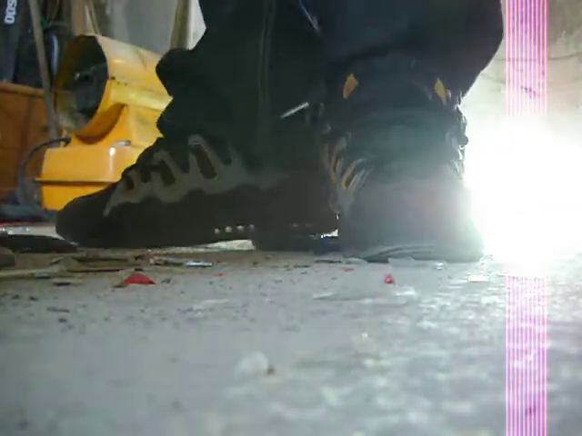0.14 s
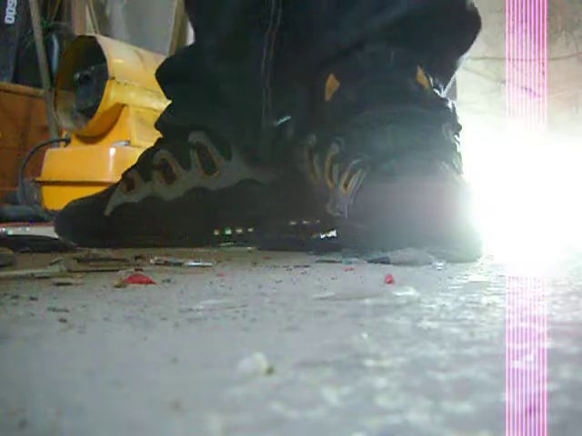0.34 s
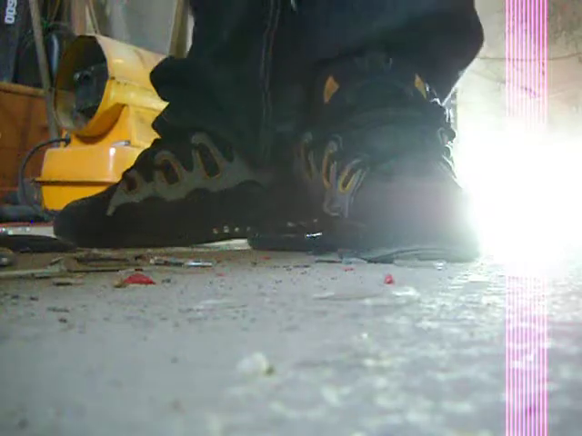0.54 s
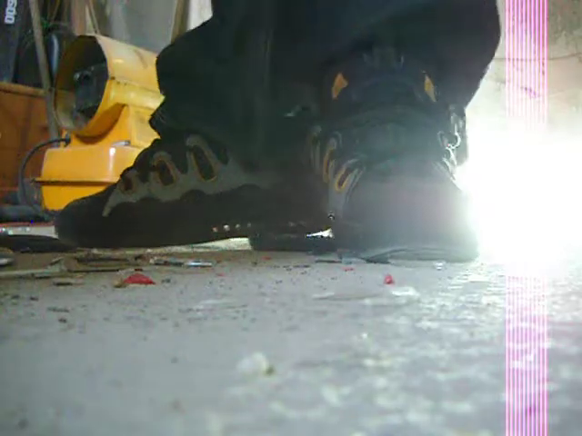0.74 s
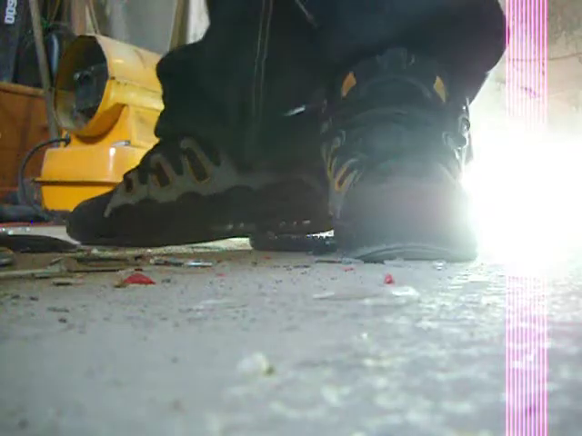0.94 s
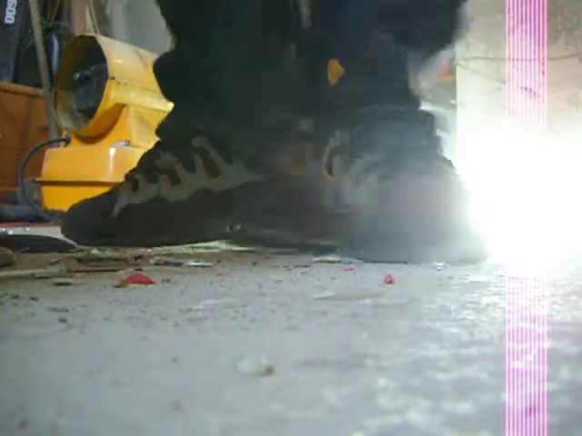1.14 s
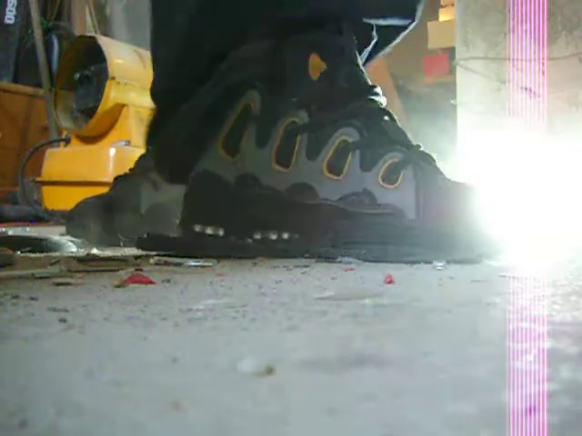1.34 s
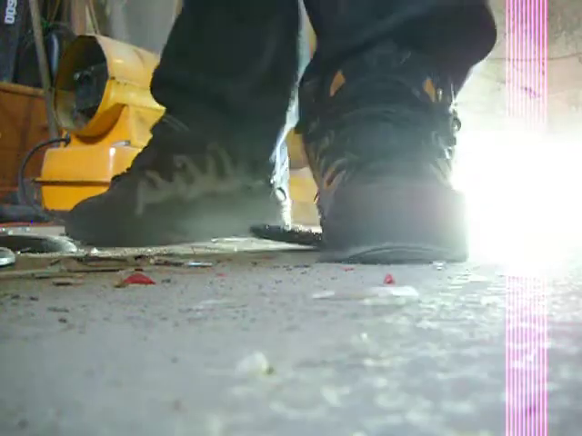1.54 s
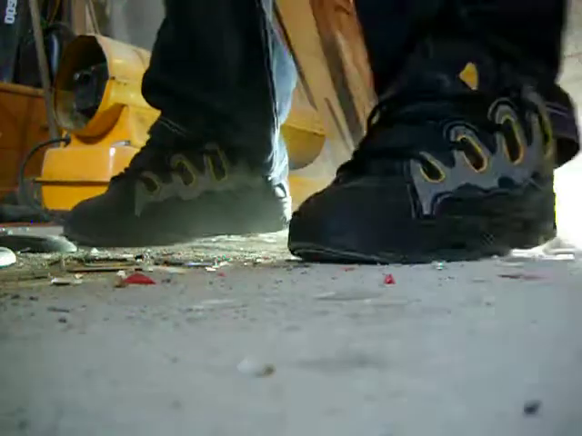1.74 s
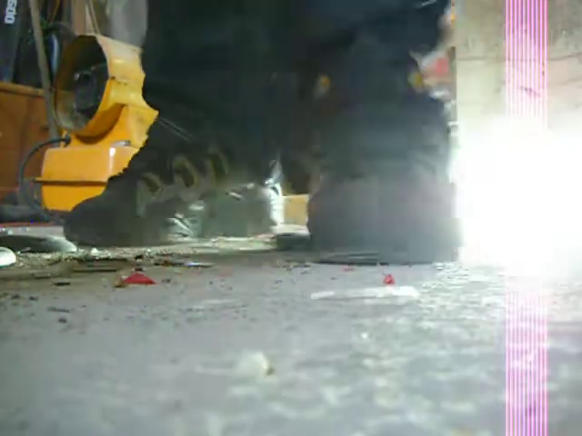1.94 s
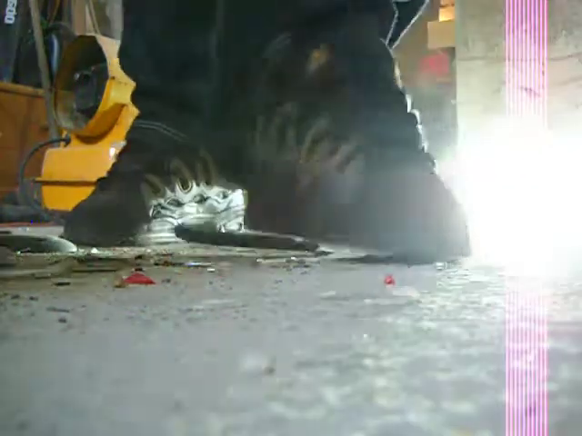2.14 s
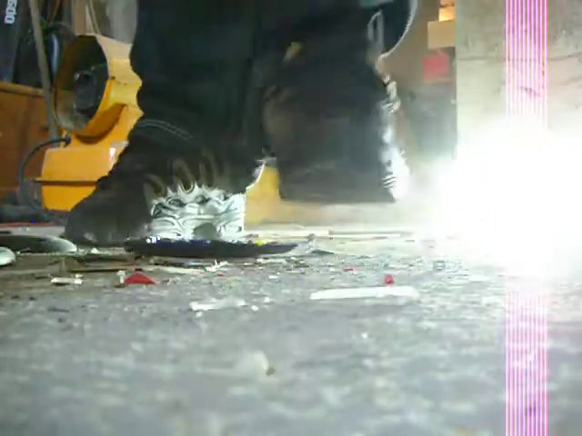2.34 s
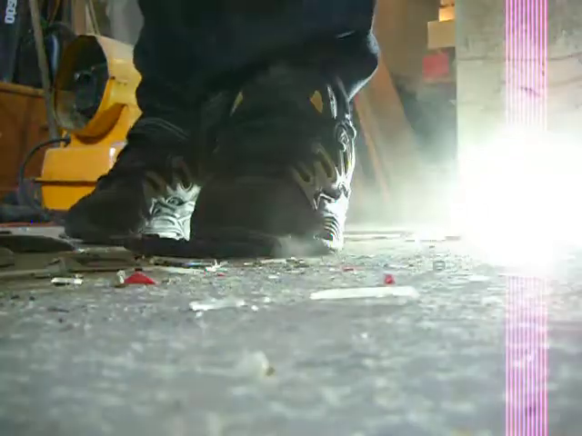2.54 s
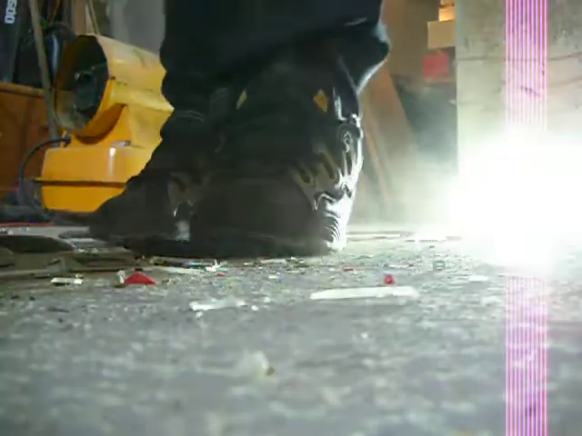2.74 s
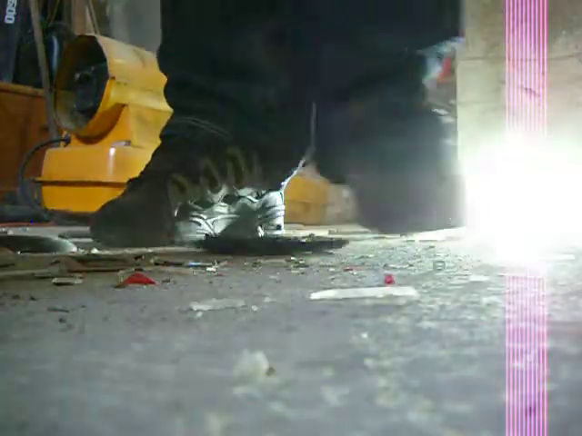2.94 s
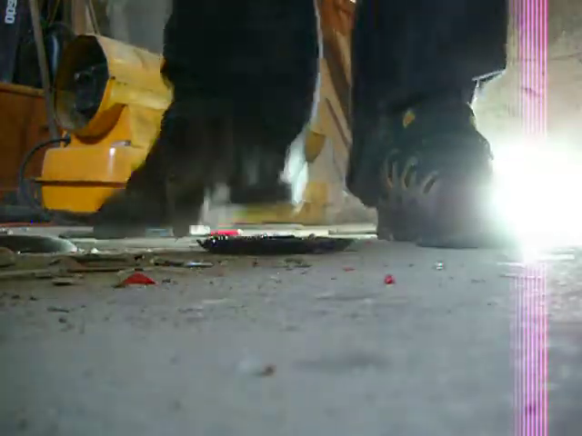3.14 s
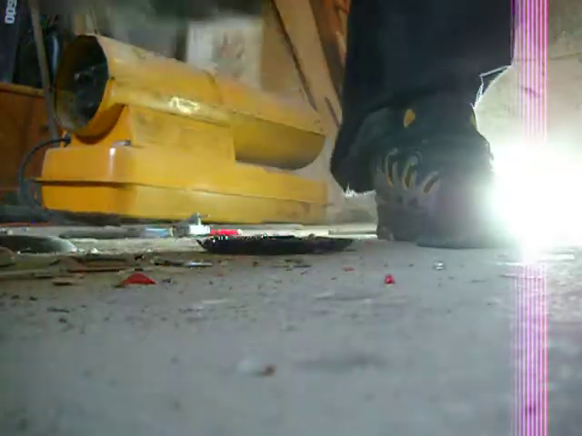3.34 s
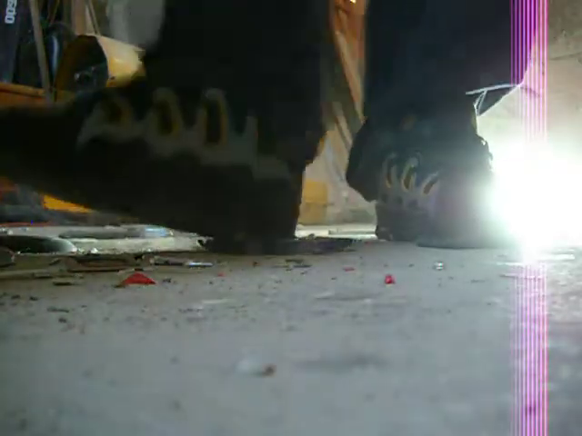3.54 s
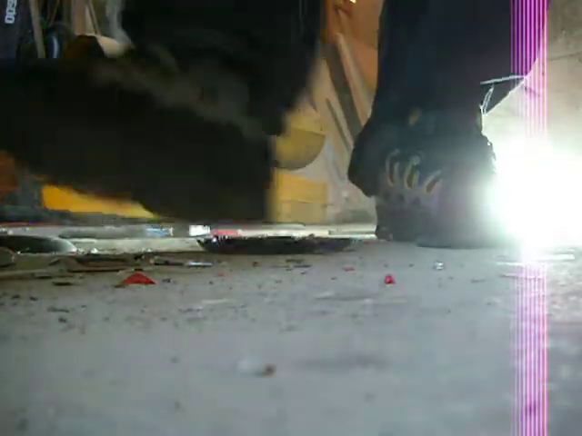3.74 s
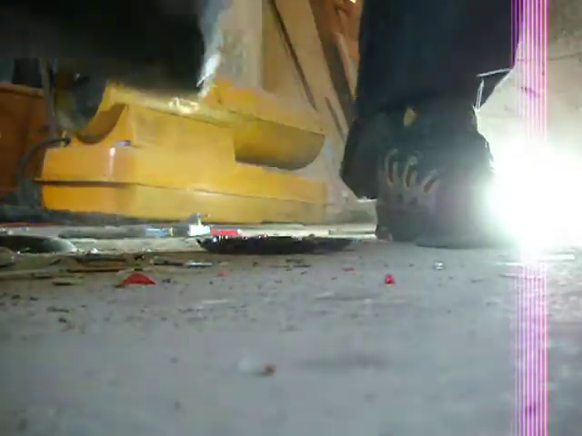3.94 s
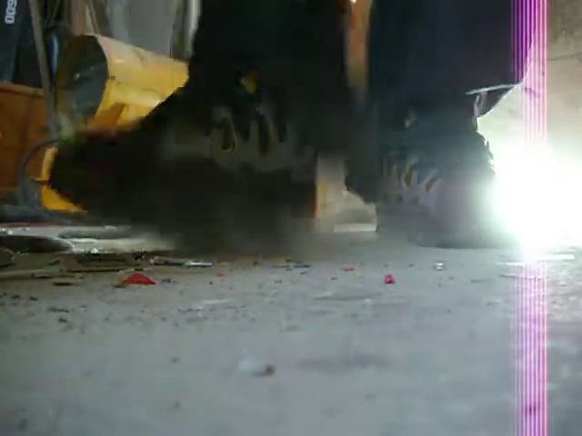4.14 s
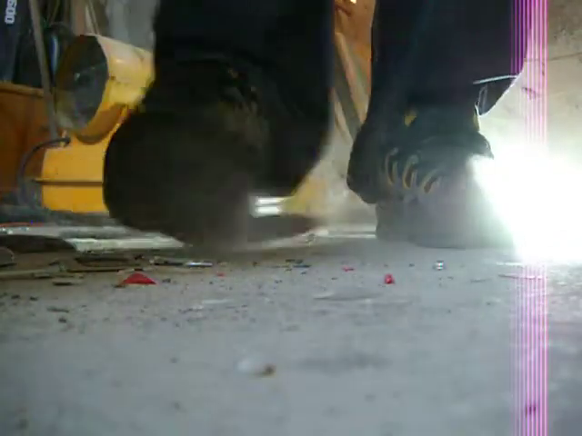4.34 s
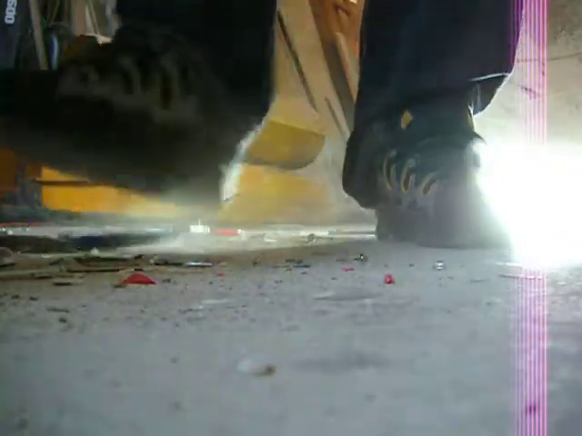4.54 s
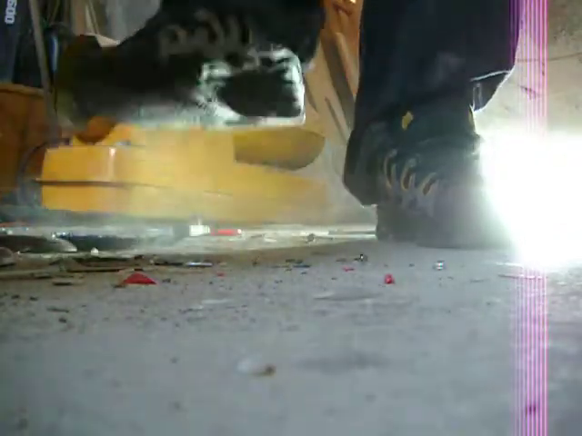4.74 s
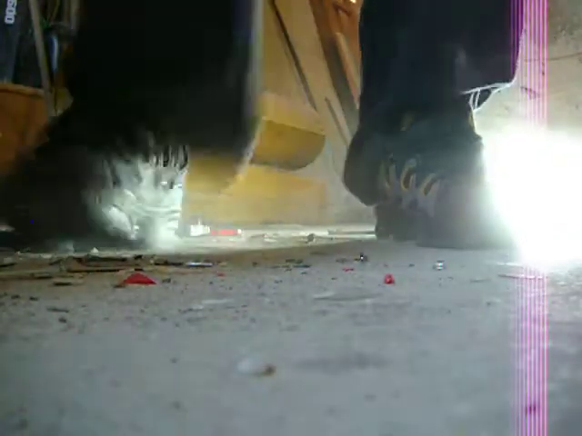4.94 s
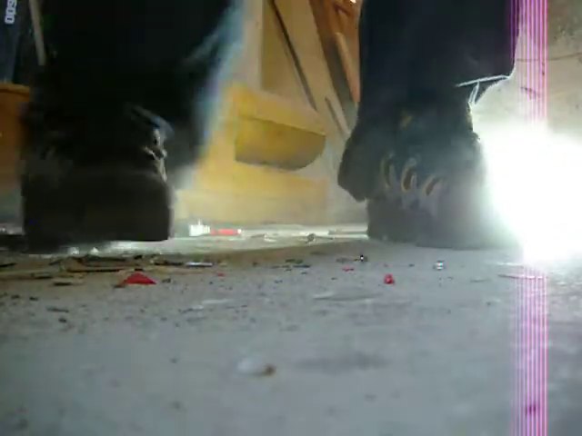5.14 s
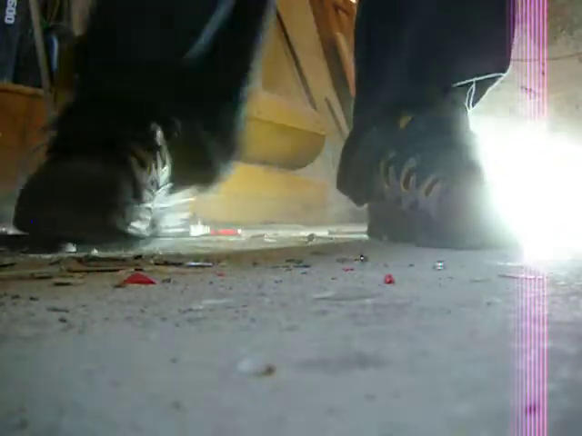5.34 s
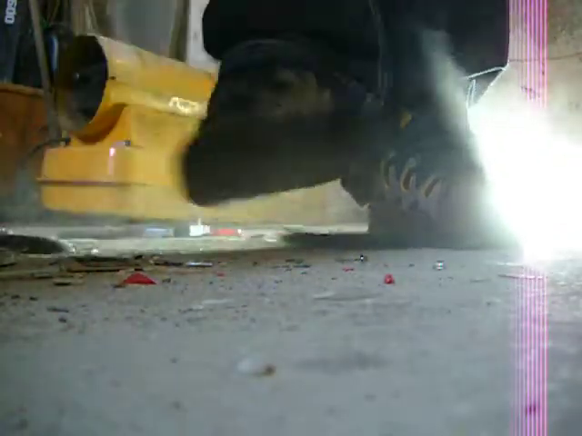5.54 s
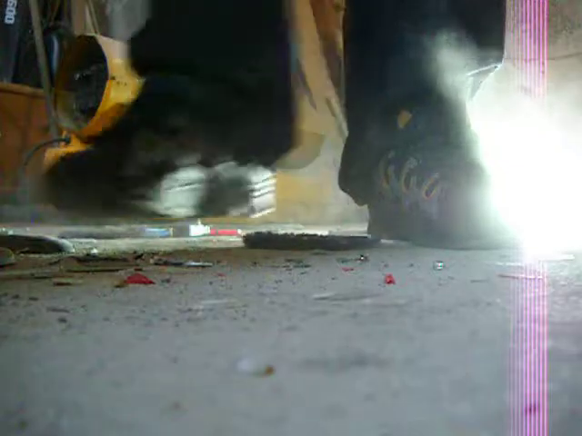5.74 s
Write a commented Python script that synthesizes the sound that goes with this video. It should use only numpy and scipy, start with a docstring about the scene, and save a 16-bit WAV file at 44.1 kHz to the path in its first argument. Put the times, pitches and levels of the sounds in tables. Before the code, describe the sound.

Boots crunch and twist on broken glass on a concrete workshop floor, shards snapping, then heavy separate stomps boom close to a cheap camera.

```python
"""Boots grind and crunch on broken glass and debris on a concrete workshop floor, heard by a camera lying close by.
A light slap opens over steady hiss; crunches swell, with clumps of ringing shards and sharp snaps.
A blow lands near 2.5 s, then heavy stomps near 3.6, 4.2 and 5.0 s set low modes of floor and walls ringing.
Crunching goes on between them and to the end. The small camera samples at 8 kHz and clips the loud moments."""
import sys
import numpy as np
from scipy import signal
from scipy.fft import irfft
from scipy.io import wavfile
from scipy.ndimage import uniform_filter1d

SR = 44100
rng = np.random.default_rng(int(sys.argv[2]) if len(sys.argv) > 2 else 0)


def int16_out(signal):
    """Quantize to a 16-bit WAV file."""
    q = np.round(np.clip(np.atleast_2d(signal).T, -1, 1) * 32767)
    wavfile.write(sys.argv[1], SR, q.astype(np.int16))


N = 260190  # samples, 5.9 s


def gain_of(db):
    """Turns a level in dB into an amplitude factor."""
    return 10 ** (np.asarray(db) / 20)


def evened(x):
    """Scales a signal to rms 1."""
    return x / np.sqrt(np.mean(x ** 2) + 1e-20)


def read(points, hz):
    """Reads a table over frequency at hz, interpolating along log frequency."""
    f, value = np.transpose(points)
    return np.interp(np.log(hz + 1), np.log(f + 1), value)


def add(mix, s, sound):
    """Mixes a sound in at time s, cut off at the end of the mix."""
    part = mix[round(s * SR):][:len(sound)]
    part += sound[:len(part)]


def colour(x, points):
    """Shapes x with a causal minimum-phase filter of the given spectrum and unit energy."""
    level_db = np.maximum(read(points, abs(np.fft.fftfreq(8192, 1 / SR))), -90)
    log_gain = np.log(gain_of(level_db))
    phase = -signal.hilbert(log_gain).imag
    taps = np.fft.ifft(np.exp(log_gain + 1j * phase)).real[:3000]
    return signal.oaconvolve(x, taps / np.linalg.norm(taps))[:len(x)]


ONSET_DB = -16.5  # where a crunch starts, under its full level
SETTLE_DB, SETTLE_DB_PER_S = -16, 75.5  # loose debris settling after each crunch


def pressure(t, rise, hold, release_db):
    """Power of one crunch: it rises, holds and releases, then loose debris settles more quietly."""
    after = np.maximum(t - rise - hold, 0)
    release = gain_of(-release_db * after) ** 2
    settling = gain_of(SETTLE_DB - SETTLE_DB_PER_S * after) ** 2
    onset = gain_of(ONSET_DB * np.maximum(1 - t / max(rise, .001), 0)) ** 2
    return onset * (release + settling)


# Each press or twist of a sole on the shards: (start [s], rise [s], hold [s], relative grit level [dB],
# relative sole scrape level [dB], grit release [dB/s], commonest ring frequency [Hz])
PRESSES = [ (0.002, 0.0029, 0.033, -34, -41, 190, 2820), (0.07, 0.032, 0.0041, -27, -23.5, 240.5, 2700),
           (0.22, 0.075, 0.0044, -39, -37.5, 159, 2690), (0.41, 0.039, .005, -23.5, -29.5, 203, 2900),
           (0.468, 0.0077, 0.0026, -21.5, -18, 277, 3020), (0.692, 0.063, 0.0025, -22.5, -22.5, 358, 2580),
           (0.759, 0.049, 0.047, -23, -21, 199, 2580), (1.072, 0.051, 0.029, -33.5, -37.5, 103, 2930),
           (1.152, 0.0037, .02, -25.5, -24, 302, 2900), (1.158, 0.036, 0.021, -10, -16, 256, 2490),
           (1.228, 0.021, .005, -7.5, -19, 221, 1850), (1.424, 0.027, .01, -26, -34, 204, 2550),
           (1.453, 0.0054, 0.019, -8.5, -23, 300, 3080), (1.471, 0.026, 0.021, -4, -12, 214, 2840),
           (1.646, 0.061, 0.003, -9, -12.5, 196, 2730), (1.875, .014, 0.049, -22, -30.5, 199, 2420),
           (1.92, 0.025, 0.067, -12, -21.5, 92, 2330), (2.075, .015, 0.0022, -18.5, -23, 162, 2370),
           (2.225, .01, .005, -23.5, -36, 165.5, 2630), (2.317, 0.023, 0.033, -32.5, -43.5, 151, 2100),
           (2.523, 0.0034, 0.0033, -20, -24, 234.5, 2200), (2.646, 0.0033, 0.0043, -32.5, -42, 297.5, 2860),
           (2.675, 0.0055, 0.0022, -23, -26.5, 598, 2800), (2.75, 0.01, 0.035, -32.5, -32, 197, 3010),
           (2.827, 0.0033, 0.0025, -23, -33.5, 398, 3000), (2.846, .01, 0.017, -26, -28.5, 199, 2600),
           (2.919, 0.0038, .005, -24, -35.5, 93, 2190), (3.061, 0.0086, 0.0046, -30, -38, 110, 2100),
           (3.157, 0.0094, 0.0043, -54, -36, 214, 2480), (3.571, 0.0028, 0.0051, -15.5, -15, 150, 2360),
           (4.066, .012, 0.0084, -32, -34.5, 252, 2160), (4.174, 0.0034, 0.015, -4, -8.5, 151, 2220),
           (4.381, 0.0116, .01, -24, -29.5, 197, 2350), (4.402, 0.0016, 0.054, -16.5, -33.5, 208, 2840),
           (4.525, 0.0026, 0.0063, -23.5, -30, 404, 2700), (4.541, 0.0027, 0.0087, -24, -47, 500, 2520),
           (4.565, .003, 0.0076, -31, -35.5, 152, 3060), (4.618, 0.0064, .005, -25.5, -41, 250, 2480),
           (4.978, 0.0055, 0.0058, -11.5, -4.5, 165.5, 1930), (5.139, 0.0035, 0.067, -14, -22, 223, 2640),
           (5.255, 0.098, 0.044, -21, -34, 200, 2700), (5.392, 0.042, 0.032, -3.5, -31, 397, 2590),
           (5.457, 0.013, 0.031, -3.5, -34, 399, 1900), (5.56, 0.02, 0.0087, -20.5, -25.5, 143, 2520)]
# Spectrum of glass grit, also used by the snaps: (frequency [Hz], relative level [dB])
GLASS_SPECTRUM = [(590, -13.5), (1000, -25), (1610, -14), (1910, 4.5), (2720, -1), (3070, 3), (3540, 0.5),
                  (3900, 3), (5070, -85), (8580, -120)]
# Dull spectrum of the sole, also used by snaps and stomps: (frequency [Hz], relative level [dB])
SOLE_SPECTRUM = [(20, -59.5), (50, -32), (100, -11), (200, -2), (320, 0), (450, 6), (800, 2.5), (1300, -4),
                 (2500, -7), (4000, -32.5)]
SOLE_RELEASE = 0.78  # release rate of the scrape relative to the grit: it dies slower
GRAINS_PER_S = 4000  # mean rate of breaking shards
RING_KINDS = 24  # shard pitches


def grind():
    """Tiny shards break in clumps; each rings a few cycles, and the sole rumbles with them."""
    t = np.arange(SR // 2) / SR
    grit, sole, log_hz = np.full((3, N), 1e-12)
    for s, rise, hold, grit_db, sole_db, release_db, hz in PRESSES:
        power = gain_of(grit_db) ** 2 * pressure(t, rise, hold, release_db)
        add(grit, s, power)
        add(log_hz, s, power * np.log(hz))
        scrape = pressure(t, rise, hold, SOLE_RELEASE * release_db)
        add(sole, s, gain_of(sole_db) ** 2 * scrape)
    common_log_hz = log_hz / grit  # average over overlapping presses, weighted by power

    clumps = gain_of(1.38 * evened(uniform_filter1d(rng.standard_normal(N), 300)))
    share = np.clip(GRAINS_PER_S / SR, 1e-4, 1)  # chance of a break per sample
    size = gain_of(2.47 * np.minimum(rng.exponential(1, N), 5)) * rng.choice([-1, 1], N)
    breaks = rng.random(N) < share
    grains = size * breaks / np.sqrt(share) * clumps

    kind = rng.integers(0, RING_KINDS, N)
    t = t[:600]
    rings = np.zeros(N)
    for k, hz in enumerate(np.geomspace(1100, 3900, RING_KINDS)):
        fade = gain_of(read(GLASS_SPECTRUM, hz) - 60 * t * hz / 35.2)  # 60 dB down in 35.2 cycles
        ring = fade * np.sin(2 * np.pi * hz * t) * hz / 25000.0
        # shards near the commonest pitch ring louder
        favoured = gain_of(5.9 * np.exp(-((np.log(hz) - common_log_hz) / 0.22) ** 2))
        struck = np.sqrt(grit) * favoured * grains * (kind == k)
        rings += signal.oaconvolve(struck, ring)[:N]

    grainy = evened(colour(grains, SOLE_SPECTRUM))
    smooth = 0.93 * colour(rng.standard_normal(N), SOLE_SPECTRUM)
    return rings + np.sqrt(sole) * evened(grainy + smooth)


# Shards that snap or tumble: (time [s], relative level [dB], sole knock relative to it [dB], ring [Hz])
SHARD_SNAPS = [(0.0808, -9, -16, 3570), (0.101, -7.5, -8, 2940), (0.1126, -10.5, 5, 2700),
               (0.245, -25.5, -10, 2160), (0.3022, -13.5, 3.5, 2700), (0.4237, -7, -15, 3470),
               (0.4416, -2.5, -21, 3100), (0.4599, -16.5, 3.5, 2310), (0.473, -3, -21, 3320),
               (0.478, -3, -21, 3740), (0.506, -6.5, -28, 2180), (0.5697, -11.5, 14.5, 3580),
               (0.6792, -15, 6, 2280), (0.7133, -6, -19, 3090), (0.7334, 0, -4, 3220),
               (0.7478, -2, -17.5, 3100), (0.7575, -4.5, -5, 2300), (0.796, -12, 3.5, 2410),
               (0.824, -5.5, 1.5, 3300), (0.8385, 1.5, -16, 3410), (0.8785, -8.5, -21, 2800),
               (1.1167, -10.5, -30, 2980), (1.1258, -12, -31, 2580), (1.1532, -0.5, -20.5, 3040),
               (1.1636, 5.5, -18, 2790), (1.1826, 0, 2.5, 3360), (1.196, -0.5, -18, 3120),
               (1.2173, 9.5, -6.5, 2890), (1.2365, -12.5, -17, 2310), (1.248, 10.5, -23, 1965),
               (1.257, 9.5, -5, 1940), (1.277, 5.5, -21, 3200), (1.3039, 5.5, -18, 3520),
               (1.4626, 2.5, -33, 3800), (1.485, 6.5, -20.5, 2800), (1.4936, 6.5, -34, 2740),
               (1.5628, -1.5, -10, 3520), (1.6462, -10.5, -9, 2450), (1.6636, -11.5, -13, 2550),
               (1.6816, -2.5, -11, 3390), (1.6894, 2, -14, 2480), (1.697, -2, -12, 2630),
               (1.7387, 9, 0, 2425), (1.8803, -7, -22, 3300), (1.9175, -9, -4, 1490),
               (1.937, 10.5, -21, 2280), (1.9776, 3, -31, 2895), (2.0115, 1, -23.5, 3585),
               (2.0472, -9, -15, 2330), (2.0847, -11, -19, 2210), (2.1171, -10, -5, 3580),
               (2.1665, -23.5, -8, 2190), (2.2362, -3, -22, 1980), (2.2378, 1, -27, 2980),
               (2.249, -9, -19, 3300), (2.2865, -8.5, -12.5, 3560), (2.3241, -14, -23, 3830),
               (2.3522, -18.5, -1, 3330), (2.362, -19.5, -22, 2100), (2.5243, 1, -2.5, 2060),
               (2.6217, -11, -29, 3220), (2.648, -26, -15, 3500), (2.6745, 1.5, -20, 3423),
               (2.7197, -17, -7, 2100), (2.7621, -13, -7, 3400), (2.7791, -17.5, -6, 2410),
               (2.8335, -3.5, -25, 3550), (2.842, -6, -20, 3000), (2.8714, -17, -7, 1950),
               (2.8926, -10.5, 2, 1940), (2.9263, -6, -28, 2140), (2.969, -18, -12, 2050),
               (3.0031, -23, -21, 1793), (3.0651, -6.5, 3.5, 2890), (3.1789, -14, -5, 2600),
               (3.5741, 19.5, -30, 2070), (3.765, -21, -15, 3600), (3.8038, -22, -15, 2050),
               (3.8352, -20.5, -2, 2140), (4.0682, -15, -19, 2040), (4.075, -13.5, -11, 1970),
               (4.082, -13, -10, 2850), (4.1754, 17.5, -2.5, 1940), (4.2227, 2, -11, 3320),
               (4.273, 1.5, -15, 2730), (4.3273, -1, -18, 1880), (4.362, -5, -13, 2060),
               (4.3945, -9, -1, 2730), (4.4131, 0, -23, 2080), (4.4191, -1.5, -23, 3150),
               (4.43, 2.5, -23, 2050), (4.4397, 3.5, -21, 3790), (4.4503, -19.5, -31, 2010),
               (4.5136, 6, -8, 1973), (4.541, -6.5, -28, 2040), (4.5695, -5.5, -11, 2730),
               (4.59, -4.5, -11, 2840), (4.6189, -19, -17, 2850), (4.6336, -3.5, -26, 2790),
               (4.6568, -11, -22, 2180), (4.9791, 14, 25, 1790), (5.0888, -11, 0, 1570),
               (5.127, -14, -7, 1540), (5.144, -22, -9, 1880), (5.1655, 0, -14, 1960),
               (5.1887, 6.5, -26, 2890), (5.286, -12, -14, 2850), (5.2954, -8.5, -11, 3380),
               (5.3279, -12, 5, 3000), (5.337, -23, -1, 3100), (5.3617, 6.5, -27, 2620),
               (5.4025, 5.5, -24, 3160), (5.4221, 15.5, -14, 3230), (5.437, 14.5, -27, 2620),
               (5.5772, -1, -30, 2760), (5.657, -7.5, -10, 2080), (5.7162, -7.5, -28, 2800)]
SNAP_T60_S, RING_T60_S, KNOCK_T60_S = 0.013, 0.009, 0.012  # time to fall by 60 dB


def cracks():
    """A snap is one sharp break with splinters after it, a short shard ring and a knock through the sole."""
    glass, ring, sole = np.zeros((3, N))
    t = np.arange(2600) / SR
    noise = rng.standard_normal((len(SHARD_SNAPS), 2, len(t)))
    for (s, db, knock_db, hz), (splinter_noise, sole_noise) in zip(SHARD_SNAPS, noise):
        splinter_fade = gain_of(db - 60 * t / SNAP_T60_S) * np.minimum(t / 0.00028, 1)
        click = 1.69 * gain_of(db) * (t == 0)
        add(glass, s, splinter_fade * splinter_noise + click)
        ring_fade = gain_of(db - 60 * t / RING_T60_S) * np.minimum(t / 0.00048, 1)
        add(ring, s, ring_fade * np.sin(2 * np.pi * hz * t))
        knock_fade = gain_of(db + knock_db - 60 * t / KNOCK_T60_S) * np.minimum(t / 0.0038, 1)
        add(sole, s, knock_fade * sole_noise)
    glass = gain_of(-10) * colour(glass, GLASS_SPECTRUM)
    return glass + gain_of(-1.5) * ring + gain_of(-7) * colour(sole, SOLE_SPECTRUM)


# Flat boot blows: (time [s], slap level [dB], heel knock level [dB], sole thump level [dB],
# floor boom level [dB], slap t60 [s]), all levels relative
BOOT_BLOWS = [(0.004, 3, -22, -48.5, -51, 0.011), (2.523, -8, -19, -24.5, -28, 0.025),
              (3.574, 4.5, -9, -12.5, -5.5, 0.12), (4.068, -39, -33, -65, -57, 0.15),
              (4.176, 6.5, 1, -12, -10, 0.2), (4.980, 17, 10, 6.5, -8.5, 0.087)]
# Floor and walls ringing low: (frequency [Hz], relative level [dB], t60 [s])
LOW_MODES = [(80.9, -10, 0.6), (113.5, -16, 0.82), (168.5, -1.5, 0.41), (201, -13.5, 0.29),
             (226.4, -10, 0.58), (271, -9, 0.44), (410, 1, 0.15), (454, -3, 0.2), (515, -12.5, 0.2)]
# Bright slap of the flat sole: (frequency [Hz], relative level [dB])
SLAP_SPECTRUM = [(100, -9), (500, -6.5), (1200, -19), (2200, 10), (3300, 7), (4000, 2)]
# Hard knock of the heel: (frequency [Hz], relative level [dB])
HEEL_SPECTRUM = [(300, -31), (700, 1.5), (1000, -1.5), (1500, 5), (2200, -20.5), (4000, -38.5)]
# The floor shaking the camera: (frequency [Hz], relative level [dB])
SHAKE_SPECTRUM = [(15, -2), (35, -6.5), (60, -2.5), (120, -31), (300, -50)]
SHAKE_DB, SHAKE_T60_S = -12.5, 0.5  # level within the boom, decay


def stomps():
    """The slap is at once, knock and thump rise in a few ms, and the low modes ring on unevenly."""
    slap, knock, thump, boom = np.zeros((4, N))
    t = np.arange(SR // 2) / SR
    noise = rng.standard_normal((len(BOOT_BLOWS), 3, len(t)))
    wander = rng.standard_normal((len(BOOT_BLOWS), len(LOW_MODES), len(t)))
    beats = evened(uniform_filter1d(wander, 900))
    modes = np.array([gain_of(db - 60 * t / t60) * np.sin(2 * np.pi * hz * t) for hz, db, t60 in LOW_MODES])
    shake_fade = gain_of(SHAKE_DB - 60 * t / SHAKE_T60_S)
    for blow, (slap_noise, knock_noise, thump_noise), beat in zip(BOOT_BLOWS, noise, beats):
        s, slap_db, knock_db, thump_db, boom_db, t60 = blow
        add(slap, s, gain_of(slap_db - 60 * t / t60) * slap_noise)
        knock_fade = gain_of(knock_db - 60 * t / (1.86 * t60)) * (1 - np.exp(-t / 0.0038))
        add(knock, s, knock_fade * knock_noise)
        thump_fade = gain_of(thump_db - 60 * t / (1.95 * t60)) * (1 - np.exp(-t / 0.0018))
        add(thump, s, thump_fade * thump_noise)
        # random wavering stands for close neighbours beating with each mode
        ringing = (modes * (1 + .45 * beat)).sum(0)
        shake = shake_fade * colour(thump_noise, SHAKE_SPECTRUM)
        add(boom, s, gain_of(boom_db) * (1 - np.exp(-t / 0.00071)) * (ringing + shake))
    blows = colour(slap, SLAP_SPECTRUM) + colour(knock, HEEL_SPECTRUM) + colour(thump, SOLE_SPECTRUM)
    return blows, boom


# Reverberation of the workshop: (frequency [Hz], t60 [s])
ROOM_DECAY = [(60, 0.36), (200, 0.5), (500, 0.29), (1000, 0.33), (1450, 0.22), (2050, 0.21), (2700, 0.26),
              (4000, 0.21)]
ROOM_DB = -11  # send level into the room tail


def room(x):
    """Sparse reflections of random sign, each band dying at its own speed."""
    taps = np.zeros(SR)
    at = np.arange(200, SR - 10, 10)
    taps[at + rng.integers(0, 10, len(at))] = rng.choice([-1., 1.], len(at))
    hz, t, bands = signal.stft(taps, SR, nperseg=512)
    fade = gain_of(-60 * t / read(ROOM_DECAY, hz)[:, None])
    tail = signal.istft(bands * fade, SR, nperseg=512)[1]
    return signal.fftconvolve(x, tail / np.linalg.norm(tail))[:N]


# Hiss and low rumble: (frequency [Hz], relative level [dB])
HISS_SPECTRUM = [(15, -5.5), (25, -2), (65, -17.5), (85, -1), (103, -1.5), (144, -12.5), (704, -10),
                 (1300, -19), (3360, -22), (3900, -27), (5070, -53.5), (8580, -120)]
HISS_DB = -45.5  # rms level before the camera


def background():
    """Steady hiss with a low rumble, made from coloured noise."""
    return gain_of(HISS_DB) * evened(colour(rng.standard_normal(N), HISS_SPECTRUM))


def scene():
    """Sums the boots, their room tail, the low boom and the background."""
    blows, boom = stomps()
    boots = grind() + cracks() + blows
    return (boots + gain_of(ROOM_DB) * room(boots) + boom + background())[None]


# Playback smoothing, which lets a little of the mirrored band through: (frequency [Hz], gain [dB])
PLAYBACK_SMOOTHING = [(3000, -1.5), (3700, 1), (4000, -12), (4300, -17.5), (4500, -34), (4650, -65.5),
                      (4800, -110)]
CAMERA_SR, EDGE_HZ = 8000, 16700  # sampling rate [Hz], final low-pass edge [Hz]


def record(dry):
    """The camera samples at 8 kHz and clips; smoothed playback overshoots, clips again and is band-limited."""
    count = N * CAMERA_SR // SR
    sampled = np.clip(signal.resample_poly(dry[0], up=80, down=441)[:count], -.72, .72)
    bins = np.arange(N // 2 + 1)
    mirrored = np.fft.fft(sampled)[bins % count] * N / count  # sampling repeats the spectrum
    smoothing = gain_of(read(PLAYBACK_SMOOTHING, bins * SR / N))
    played = np.clip(irfft(mirrored * smoothing, N), -.71, .71)
    low_pass = signal.firwin(511, EDGE_HZ, window=("kaiser", 9), fs=SR)
    return signal.oaconvolve(played, low_pass, "same")[None]


dry = scene()
out = record(dry)
int16_out(out)
```